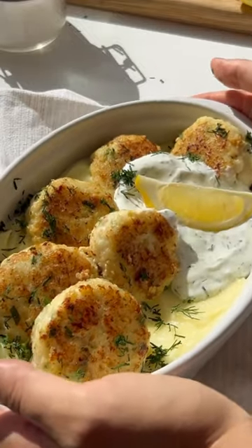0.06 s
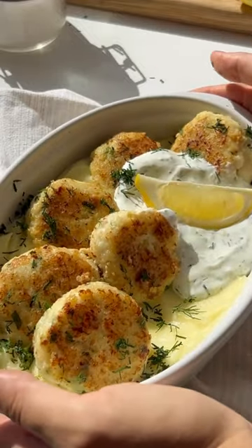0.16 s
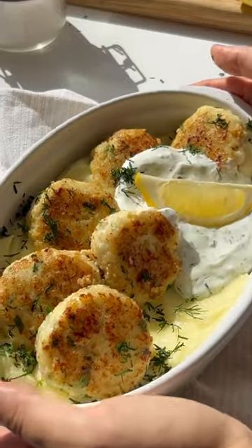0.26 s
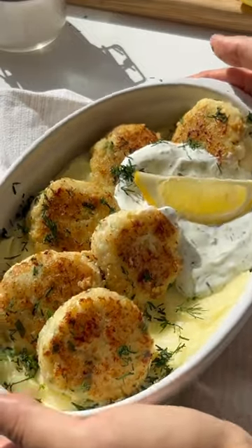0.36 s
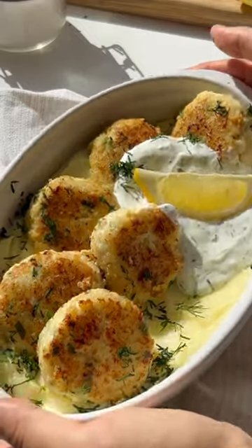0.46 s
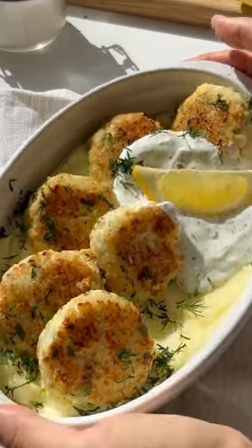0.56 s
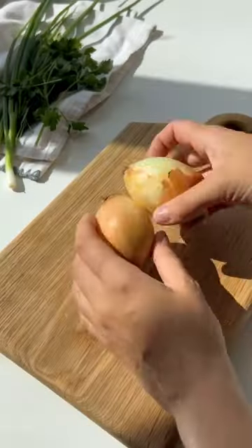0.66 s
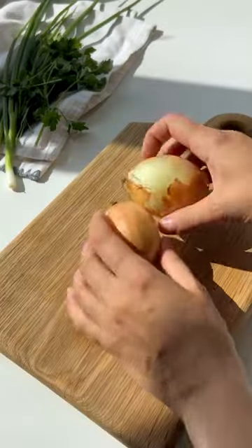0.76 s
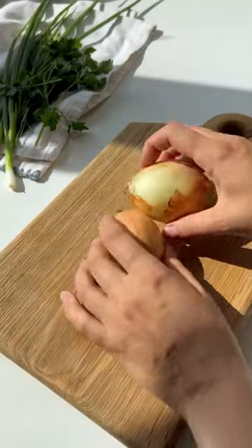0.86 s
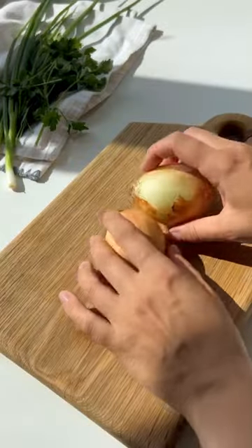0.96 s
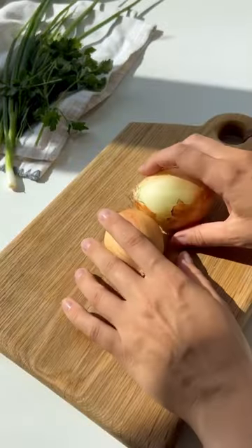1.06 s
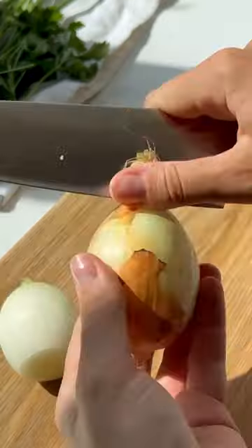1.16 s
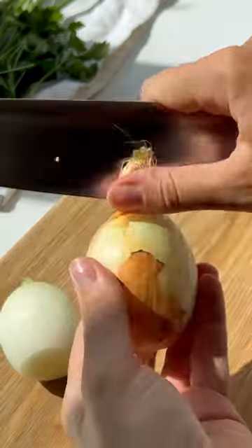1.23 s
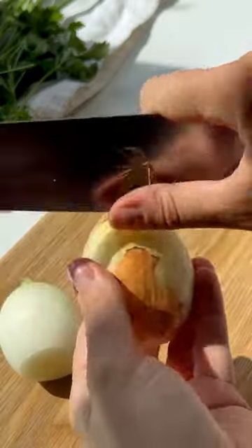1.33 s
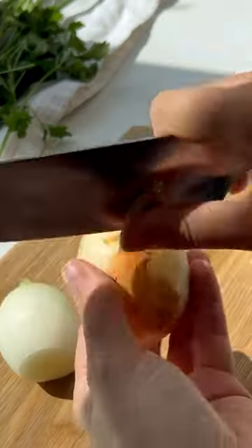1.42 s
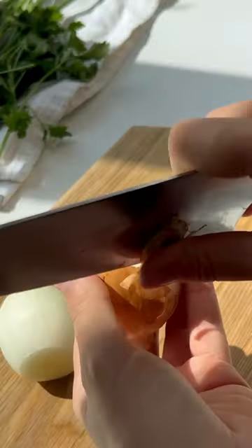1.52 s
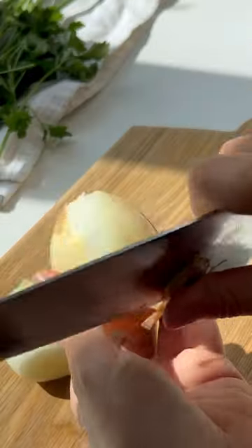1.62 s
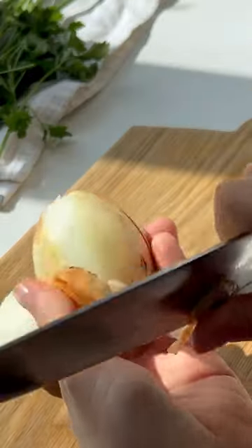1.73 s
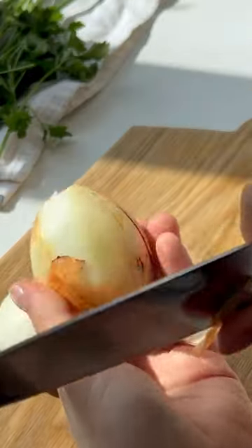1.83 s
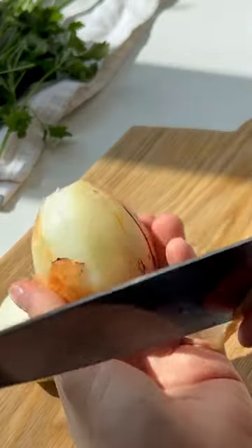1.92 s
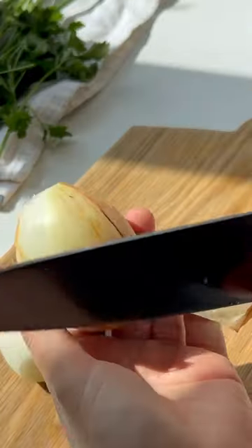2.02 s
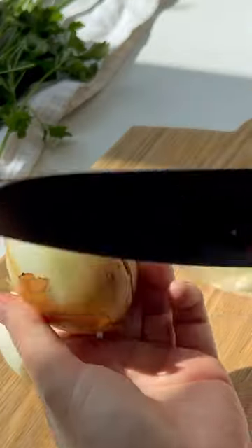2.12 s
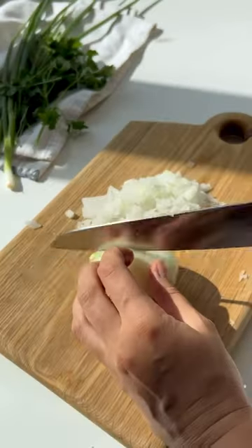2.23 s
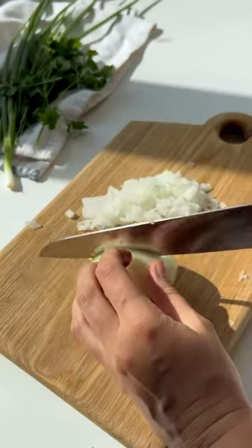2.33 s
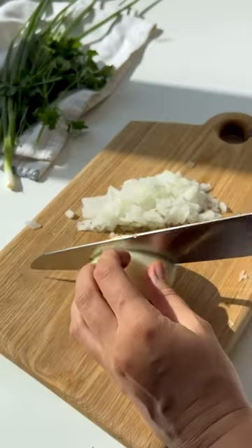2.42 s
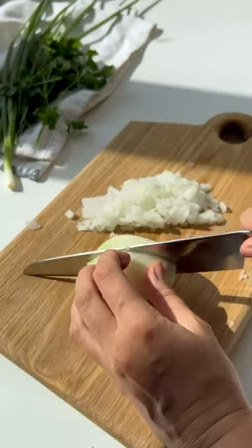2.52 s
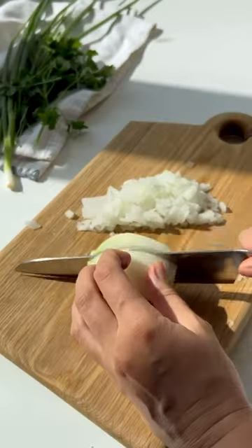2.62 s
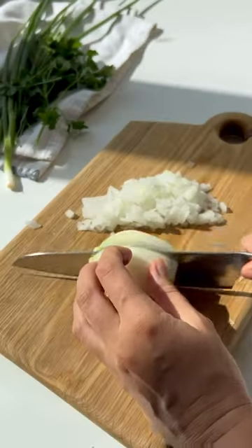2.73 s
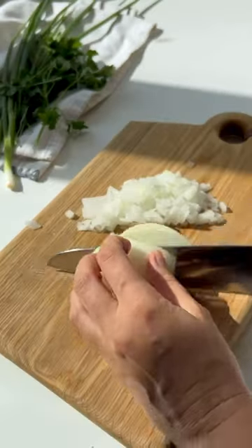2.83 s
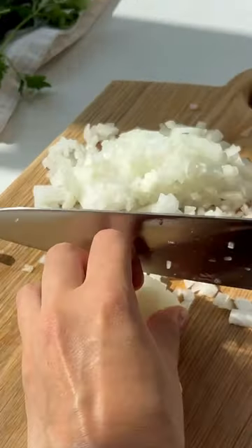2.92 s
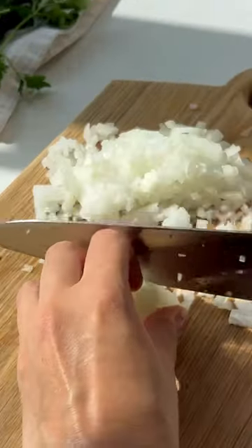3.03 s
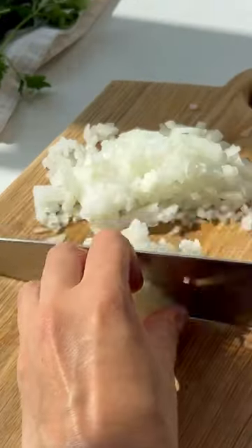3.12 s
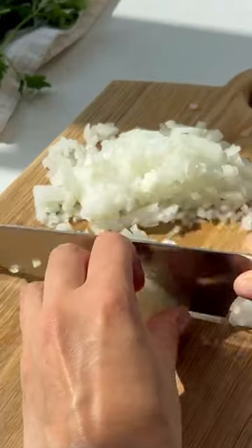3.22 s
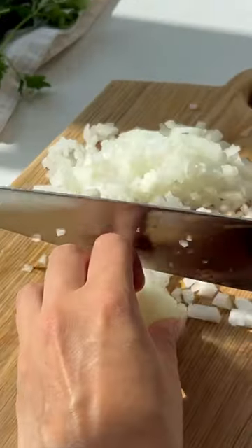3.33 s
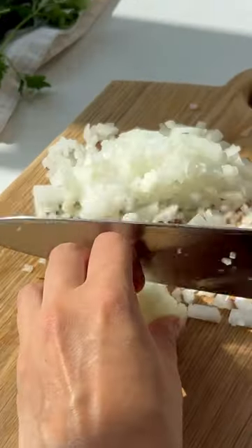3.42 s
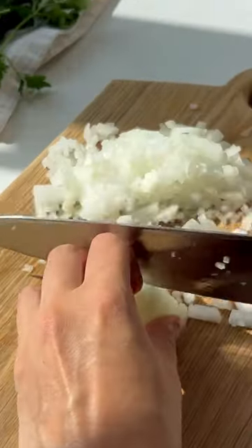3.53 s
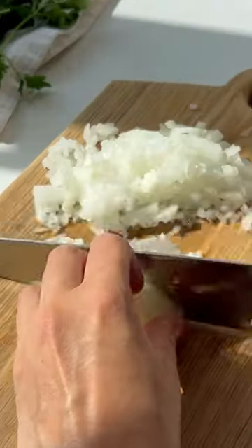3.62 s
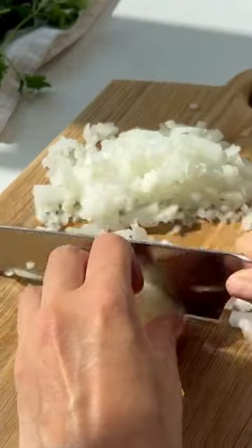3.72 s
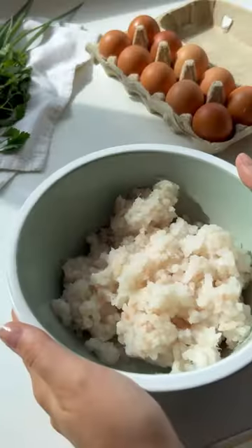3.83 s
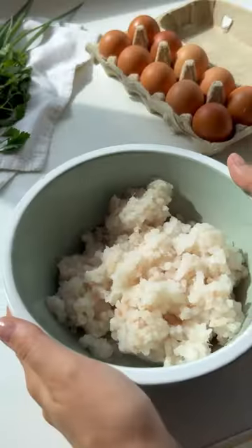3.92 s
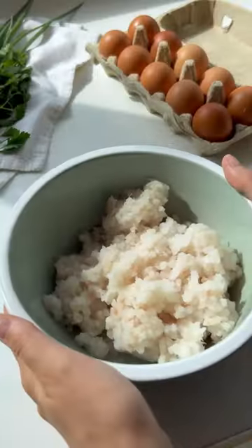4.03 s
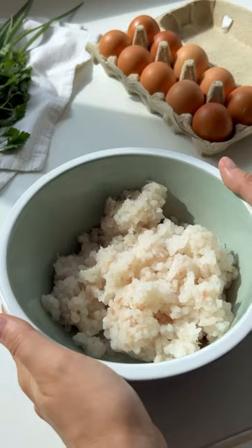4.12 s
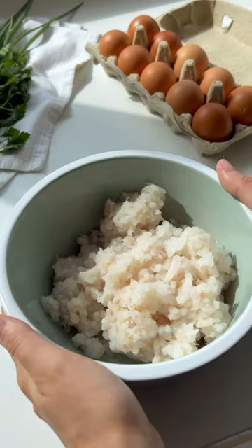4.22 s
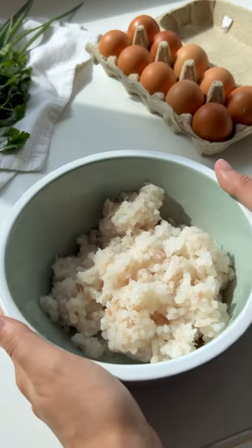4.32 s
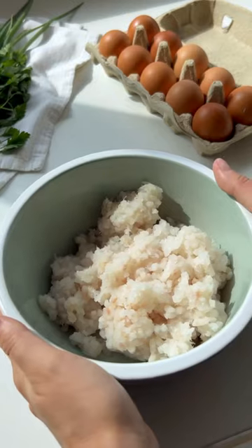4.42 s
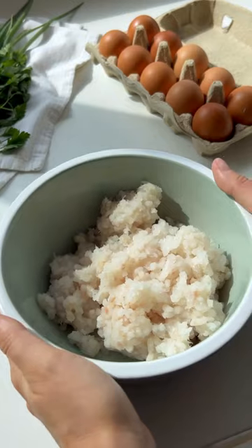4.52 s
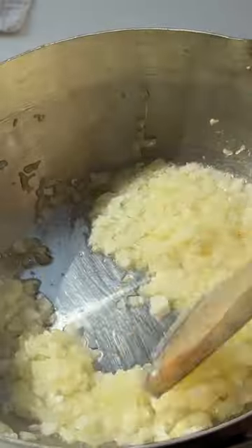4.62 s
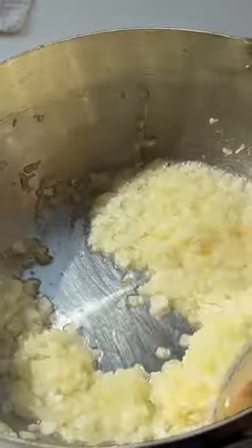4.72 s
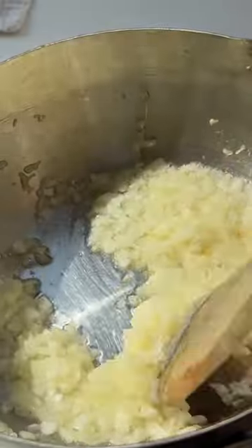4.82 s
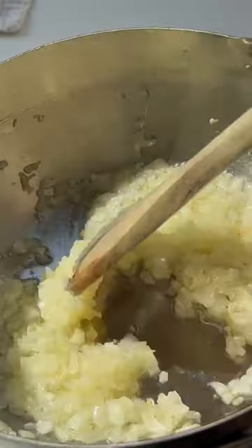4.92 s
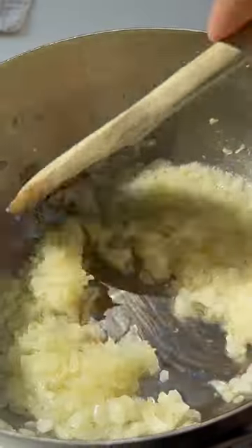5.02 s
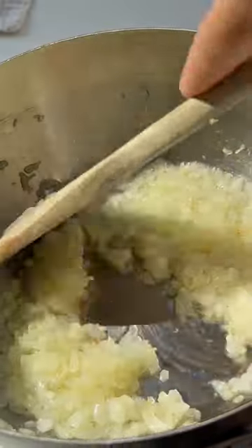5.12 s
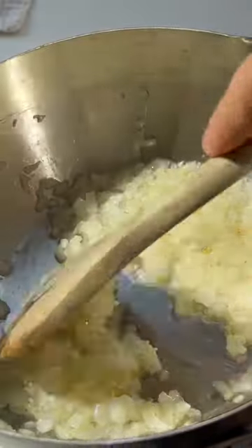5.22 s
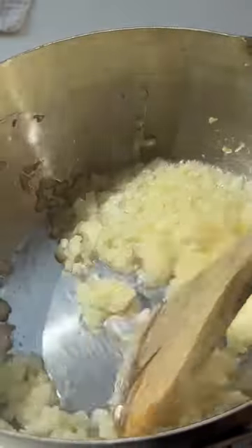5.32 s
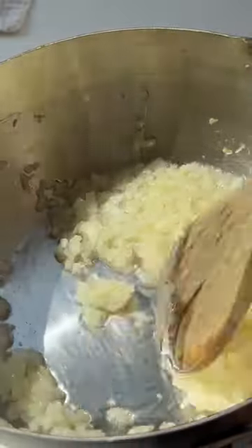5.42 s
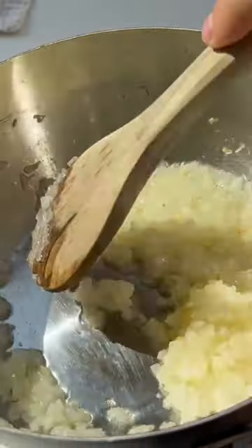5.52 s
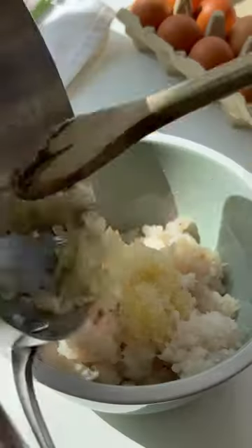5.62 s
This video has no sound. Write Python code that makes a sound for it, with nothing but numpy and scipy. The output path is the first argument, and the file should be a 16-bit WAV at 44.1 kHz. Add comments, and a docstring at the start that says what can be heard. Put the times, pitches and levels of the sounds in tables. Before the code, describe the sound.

Dry onion skin crackles, a knife crunches and knocks on a wooden board, then a bowl is set down and a spoon clanks in a sizzling pot.

```python
"""A knife crunches through an onion and knocks on a wooden board, close up in a small live kitchen. Cells burst
under the blade as tiny clicks, and its jerks rattle the board's modes. Before that, onions thud onto the board
and their dry skin crackles and tears. Afterwards a bowl is put down, and chopped onion sizzles with bursting
steam bubbles while a wooden spoon knocks and drags in the steel pot. The scene changes several times; each
section has its own room air and echo."""
import sys
import numpy as np
from scipy import signal
from scipy.fft import rfft, irfft, next_fast_len
from scipy.io import wavfile
from scipy.ndimage import uniform_filter1d

SR = 44100
rng = np.random.default_rng(int(sys.argv[2]) if len(sys.argv) > 2 else 0)


def pcm_store(signal):
    """Save signal as 16-bit PCM."""
    levels = np.round(np.clip(np.atleast_2d(signal), -1, 1) * 32767)
    wavfile.write(sys.argv[1], SR, levels.astype(np.int16).T)


N = 249606
T = np.arange(N) / SR
LN_1000 = np.log(1000)  # 60 dB of decay

# knife on board: (time [s], level [dB], contact corner [Hz], place [0 middle, 1 edge])
BOARD_KNOCKS = [(2.474, -18, 2340, 0.0089), (3.1177, -12, 1750, 1), (3.6292, -13, 1486, 1)]
# board modes: (frequency [Hz], middle level [dB], edge level [dB], t60 [s])
BOARD_MODES = [(141, -10.5, -15.5, 1), (212.6, -3.5, -10, 0.29), (374.6, 10, -7, 0.13),
               (412, 1, -14.5, 0.12), (472.5, -1.5, -29, 0.13), (576, -7, -6.5, 0.093),
               (683, -23.5, -3.5, 0.12), (718, -15, -10, 0.13), (864, 4.5, -30, 0.061),
               (927, -16, -2, 0.057), (996, -3.5, -4, 0.085), (1039, -16, -0.5, 0.1),
               (1151, -15.5, -3.5, 0.09), (1200, -3, 9.5, 0.052), (1217, -1, 3.5, 0.1),
               (1370, -22, -12, 0.05), (1580, -17.5, 4.5, 0.056), (1635, -13.5, 7.5, .036),
               (1790, -23.5, -3, 0.0498), (2240, -24, -5.5, 0.06), (2397, -20.5, -3.5, 0.06),
               (2665, 5.5, -3, 0.021), (2790, 2, -4.5, .02)]
# board clack spectrum: (frequency [Hz], middle level [dB], edge level [dB])
BOARD_CLACK = [(40, -22.5, -3), (150, -20, -16.5), (294, -18, -29), (400, -1, -16.5), (483, 1, -17),
               (595, 4, -2.5), (832, -5.5, -5), (1000, 9.5, 1.5), (1200, -4, 4.5), (1460, -26.5, -8.5),
               (1690, -19, -14.5), (2070, -17, -12), (2320, -20.5, -3.5), (2704, 2.5, -1),
               (3515, -16.5, -19), (5000, -5, -16), (9630, -27.5, -29.5)]
def board_knocks():
    """The knife hits the board; the place sets how strongly each mode answers."""
    return sum(strike([blow], blend(BOARD_MODES, place), blend(BOARD_CLACK, place), clack_db=-2.5,
                      clack_t60_s=0.02, low_hz=176, width=0.13, press_s=0.00066)
               for *blow, place in BOARD_KNOCKS)


# blade strokes: (start [s], length [s], crunch [dB], board rattle [dB], hand rumble [dB], shudder [dB])
BLADE_STROKES = [(2.201, 0.16, -44, -48, -45.5, -56), (2.363, .11, -41.5, -76, -42, -57.5),
                 (2.483, 0.11, -44.5, -66, -55, -55.5), (2.578, 0.091, -38.5, -43, -54, -60),
                 (2.951, 0.016, -41.5, -45.5, -45.5, -48), (3.037, 0.079, -35.5, -35, -41, -41),
                 (3.437, 0.0045, -48.5, -50.5, -49, -43), (3.51, 0.073, -45.5, -47.5, -48.5, -48),
                 (3.545, 0.083, -40, -35, -39, -45)]
# spectra of flesh, papery crackle, hand weight, worktop shudder: (frequency [Hz], level [dB])
CRUNCH_SPECTRUM = [(400, -14), (1300, -8), (2300, -0.5), (2800, 0.5), (3250, -3.5), (4000, -4.5),
                   (5000, -10), (7000, -9), (11000, -18)]
PAPERY_SPECTRUM = [(1500, -25.5), (3500, -9), (5500, -7.5), (8800, 3), (11500, -5.5)]
RUMBLE_SPECTRUM = [(25, -28), (60, -18.5), (100, -6), (170, 4), (230, -12), (320, -22.5), (600, -22.5),
                   (2000, -53.5)]
SHUDDER_SPECTRUM = [(20, -55.5), (31, -23), (43, -1), (70, -3.5), (110, -16.5), (500, -55.5)]
def cutting(bite_s=0.0067, swell_db=6.5, flesh_t60_s=0.048, rattle_t60_s=0.23, weight_t60_s=0.44):
    """Cells burst under the blade; the jerks travel down the steel and rattle the board."""
    crunch, rattle, push, shudder = np.zeros((4, N))
    for start_s, length_s, crunch_db, rattle_db, push_db, shudder_db in BLADE_STROKES:
        crunch += undb(crunch_db) * stroke(start_s, length_s, bite_s, flesh_t60_s, swell_db)
        rattle += undb(rattle_db) * stroke(start_s, length_s, bite_s, rattle_t60_s, swell_db)
        pressure = stroke(start_s, length_s, bite_s, weight_t60_s, swell_db)
        push += undb(push_db) * pressure
        shudder += undb(shudder_db) * pressure
    slide = undb(-50) * stroke(2.75, 0.18, bite_s, flesh_t60_s, swell_db)  # wet blade slides out
    rattle += undb(-3.5) * slide  # and grazes the board
    cells = colour(grains(rate_hz=5000, scatter_db=2.2, width=0.171, clump_db=1.1), CRUNCH_SPECTRUM)
    crackle = colour(grains(rate_hz=3000, scatter_db=1, width=0.55, clump_db=1.5), PAPERY_SPECTRUM)
    flesh = crunch * cells + (undb(-4) * crunch + slide) * crackle
    jerks = grains(rate_hz=1900, scatter_db=-2, width=0.19)
    held_modes = [(hz, db, 0.62 * t60_s) for hz, db, t60_s in blend(BOARD_MODES, 0.93)]  # hand damps
    board_ring = unit(signal.fftconvolve(jerks, ring(held_modes)[None])[:, :N])
    board = 0.94 * board_ring + 0.41 * colour(jerks, blend(BOARD_CLACK, 1))
    weight = push * colour(grains(rate_hz=450, scatter_db=-4, width=0.04), RUMBLE_SPECTRUM)
    weight += shudder * colour(rng.standard_normal(N), SHUDDER_SPECTRUM)
    return undb(-2.5) * (flesh + rattle * board + weight)


# layers giving way: (start [s], length [s], level [dB])
LAYER_CRACKS = [(2.284, .01, -35.5), (2.298, .005, -43), (2.332, 0.0056, -34), (2.371, 0.01, -34),
                (2.387, 0.0044, -38), (2.404, 0.0073, -44), (2.596, 0.0063, -38.5), (2.611, .006, -43),
                (2.651, .006, -41), (3.041, 0.0035, -49), (3.555, 0.0089, -34)]
# crack spectrum: (frequency [Hz], level [dB])
JUICY_SPECTRUM = [(500, -19.5), (1300, -4), (2100, 4.5), (3300, 7), (4200, -2.5), (5200, -10.5), (6500, -6),
                  (8500, -12), (11500, -15.5)]
def layer_cracks():
    """An onion layer gives way: its cells burst in a quick, juicy flurry."""
    gain = strokes(LAYER_CRACKS, rise_s=0.0012, t60_s=0.018, swell_db=-4)
    return gain * colour(grains(rate_hz=8000, scatter_db=0.6, width=0.3), JUICY_SPECTRUM)


# blade resonance: (frequency [Hz], half-width [Hz], level [dB])
SQUEAK_TONE = [(2750, 73, 0.031)]
def blade_squeak():
    """The steel briefly sticks and slips in the flesh."""
    return undb(-39) * stroke(3.072, 0.0093, rise_s=0.0035, t60_s=0.037) * rubbed(SQUEAK_TONE)


# blade on onion: (time [s], level [dB], contact corner [Hz])
BLADE_TAPS = [(2.964, -40.5, 1490), (3.447, -42, 1200)]
# half-onion modes: (frequency [Hz], level [dB], t60 [s])
HALF_ONION_MODES = [(690, -10.5, 0.049), (731.6, -2, 0.11), (852, -5, 0.06)]
# onion thud spectrum: (frequency [Hz], level [dB])
THUD_SPECTRUM = [(30, 5), (120, -1), (400, -8), (900, -15.5), (1500, -57), (8000, -75)]
def blade_taps():
    """The blade lands on the halved onion."""
    return strike(BLADE_TAPS, HALF_ONION_MODES, THUD_SPECTRUM,
                  clack_db=-5, clack_t60_s=0.044, low_hz=119.6, width=0.27, press_s=0.0027)


# bowl on worktop: (time [s], level [dB], contact corner [Hz])
BOWL_KNOCKS = [(4.252, -17.5, 1000), (4.266, -32, 400), (4.287, -37, 453)]
# bowl modes: (frequency [Hz], level [dB], t60 [s])
BOWL_MODES = [(173.6, -4, 0.17), (250.4, 5, 0.13), (269.4, -2, 0.29), (393, 11, 0.058), (435, 6, 0.062),
              (495, -8, 0.19), (555, -19, 0.11), (660, -9, 0.052), (684, -1, 0.14), (1000, -8, 0.17),
              (1206, -5.5, 0.094), (1450, -3, 0.045), (2160, 5, 0.018), (2650, -17, .023)]
# bowl clack spectrum: (frequency [Hz], level [dB])
BOWL_CLACK = [(40, -27), (90, -3), (250, -11), (580, 4), (1000, -1), (1800, -4.5), (2700, 6.5), (3400, -7),
              (10000, -10.5)]
def bowl_knocks():
    """A bowl is put down: one hard contact, two softer ones."""
    return strike(BOWL_KNOCKS, BOWL_MODES, BOWL_CLACK,
                  clack_db=-0.5, clack_t60_s=0.056, low_hz=105, width=1, press_s=0.0017)


# spoon on pot: (time [s], level [dB], contact corner [Hz], place [0 base, 1 wall])
POT_KNOCKS = [(4.6945, -22, 4400, 0.9), (4.8057, -31.5, 1620, 0.45), (4.859, -53, 1200, 0.16),
              (5.1285, -28.5, 497, 0.17), (5.147, -34, 297, 0)]
# pot modes: (frequency [Hz], base level [dB], wall level [dB], t60 [s])
POT_MODES = [(177, -9, -18, 0.19), (211, -5, -22, 0.092), (240.5, -7.5, -1.5, 0.32), (324, -4, -4, 0.06),
             (364, -8, -9, 0.094), (532, -15.5, 0.5, 0.16), (775, -21, 7.5, 0.1), (890, -0.5, 5, 0.033),
             (1043, -40, 7.5, 0.28), (1082, -46, 2, 0.25), (1551, -58, 12, 0.22), (1595, -36, 19.5, 0.043),
             (1660, -42, -18, 0.12), (1910, -35, -4, 0.074), (2140, -61, 8, 0.22), (2176, -58, 6.5, 0.33),
             (2630, -23, 12, 0.047), (2850, -40, -3, .24), (2892, -22, 3.5, 0.37), (3395, -45, -5, 0.15),
             (4450, -45, 2.5, 0.26), (5420, -43, 1.5, 0.08)]
# pot clack spectrum: (frequency [Hz], base level [dB], wall level [dB])
POT_CLACK = [(60, 9.5, -18.5), (150, -22, -27), (400, 1, -29), (805, -13, 24), (1200, -15, -14),
             (1580, -13, 10), (2780, -47, 19), (3400, -21, 0.5), (10000, -29, -21)]
# spoon drags: (start [s], length [s], relative level [dB])
SPOON_DRAGS = [(4.705, 0.13, -39.5), (4.91, 0.021, -56)]
# rubbed pot resonances: (frequency [Hz], half-width [Hz], level [dB])
DRAG_TONES = [(75.6, 8.1, -2), (102, 10, -11), (189, 27, -3.5), (240, 18, 6.5)]
def spoon():
    """The wooden spoon clanks on the pot's wall, drags over its base and bumps it."""
    drag = undb(-8.5) * strokes(SPOON_DRAGS, rise_s=0.01, t60_s=0.087) * rubbed(DRAG_TONES)
    return drag + sum(strike([blow], blend(POT_MODES, place), blend(POT_CLACK, place), clack_db=3.5,
                             clack_t60_s=0.027, low_hz=109, width=0.96, press_s=0.0014)
                      for *blow, place in POT_KNOCKS)


# onions on board: (time [s], level [dB], contact corner [Hz])
ONION_THUDS = [(.205, -58.5, 131), (.884, -32.5, 141), (1.034, -32.5, 105), (1.105, -52, 140),
               (1.136, -52, 130)]
# whole-onion modes: (frequency [Hz], level [dB], t60 [s])
ONION_MODES = [(97, -11, 0.042), (137, 12, 0.1), (178.2, 2.5, 0.14), (482, -25, .04)]
def onion_thuds():
    """Onions are set on the board; the soft contact leaves a dull thud."""
    return strike(ONION_THUDS, ONION_MODES, THUD_SPECTRUM,
                  clack_db=-2, clack_t60_s=0.18, low_hz=55.4, width=0.63, press_s=0.005)


# pulls on the skin: (start [s], length [s], relative rustle [dB], relative tearing [dB])
SKIN_PULLS = [(1.188, 0.053, -58, -47.5), (1.212, 0.13, -51, -55.5), (1.34, 0.043, -47, -48.5),
              (1.382, 0.18, -58.5, -55), (1.557, 0.12, -55, -51), (1.696, 0.13, -64, -53.5),
              (1.831, 0.023, -57, -55.5), (1.868, 0.12, -66.5, -53.5)]
# fingers on the skin: (start [s], length [s], relative level [dB])
FINGER_BRUSHES = [(0.621, 0.057, -55), (0.846, 0.04, -54), (0.99, 0.041, -51.5)]
# tearing spectrum: (frequency [Hz], level [dB])
TEAR_SPECTRUM = [(500, -8), (1000, -7.5), (1600, -4), (2100, 0), (2450, 7.5), (2680, 4.5), (3250, -7),
                 (5000, -9.5), (9000, -25)]
def peeling():
    """Dry skin rustles under the fingers; each pull catches, tears and eases as the skin comes free."""
    rustle, tear = np.zeros((2, N))
    for start_s, length_s, rustle_db, tear_db in SKIN_PULLS:
        pull = stroke(start_s, length_s, rise_s=0.008, t60_s=0.13, swell_db=-1.5)
        rustle += undb(rustle_db) * pull
        tear += undb(tear_db) * pull
    crackle = colour(grains(rate_hz=2400, scatter_db=2.5, width=0.6, clump_db=1.5), PAPERY_SPECTRUM)
    rip = colour(grains(rate_hz=1500, scatter_db=1, width=0.36, clump_db=5), TEAR_SPECTRUM)
    friction = grains(rate_hz=2700, scatter_db=3, width=0.58)
    brush = colour(friction, PAPERY_SPECTRUM) + colour(friction, TEAR_SPECTRUM)
    touch = strokes(FINGER_BRUSHES, rise_s=0.048, t60_s=0.054)
    return undb(5.5) * rustle * crackle + undb(-4.5) * tear * rip + 0.26 * touch * brush


def skin_strip(start_s=1.352, short_hz=2700, long_hz=1080, glide_s=0.058, bandwidth_hz=230):
    """The freed strip of skin rings, falling in pitch as it lengthens."""
    hz = long_hz + (short_hz - long_hz) * np.exp(-np.maximum(T - start_s, 0) / glide_s)
    carrier = np.exp(2j * np.pi * np.cumsum(hz) / SR)
    clicks = grains(rate_hz=700, scatter_db=1.2, width=0.78)
    pole = np.exp(-np.pi * bandwidth_hz / SR)
    resonance = signal.lfilter([1], [1, -pole], clicks / carrier) * carrier
    gain = undb(-54.5) * stroke(start_s, 0.14, rise_s=0.014, t60_s=0.45, swell_db=-2)
    return gain * unit(resonance.imag)


# snaps of skin and flesh, spits of oil: (time [s], level [dB], band frequency [Hz])
SNAPS = [(1.196, -45.5, 6860), (1.217, -37.5, 7540), (1.253, -35.5, 8400), (1.256, -30, 7300),
         (1.263, -50, 7500), (1.274, -42, 8060), (1.3155, -41, 7550), (1.3512, -44, 7400),
         (1.359, -48.5, 6500), (1.376, -43, 3360), (1.383, -43, 6000), (1.574, -57, 2650),
         (1.9425, -47.5, 8900), (1.973, -42.5, 8750), (1.987, -46, 8500), (2.110, -86, 8350),
         (2.127, -63, 7700), (2.7287, -34, 4550), (2.732, -41, 6460), (2.971, -42, 5000),
         (3.447, -45.5, 6200), (3.52, -41, 6200), (3.6, -37, 4160), (5.186, -48.5, 2470),
         (5.414, -45.5, 2530)]
def snaps(t60_s=0.0073):
    """A fibre breaks or a droplet spits: one sharp click, then a few milliseconds of splinters."""
    out, t = np.zeros((2, N)), T[:SR // 30]
    for time_s, db, hz in SNAPS:
        splinters = 0.3 * spread(rng.standard_normal((2, len(t))), 0.72) * decay(t, t60_s)
        band = signal.butter(1, [hz * 0.92, min(hz * 1.49, SR / 4)], "band", fs=SR, output="sos")
        crack = signal.sosfilt(band, (t == 0) + splinters)
        add(out, time_s, undb(db) * crack / crack[:, :SR // 250].std())
    return out


# sizzle spectrum: (frequency [Hz], level [dB])
SIZZLE_SPECTRUM = [(290, -14), (500, -12), (716, -2), (786, -5), (874, -2), (1190, -6.5), (2500, -2.5),
                   (4550, -8), (7740, -2.5), (11200, -3), (12000, -16.5), (15600, -43), (22000, -120)]
def frying():
    """Countless steam bubbles burst steadily in the hot oil."""
    gain = undb(-50) * stroke(4.574, 0.99, rise_s=0.023, t60_s=0.018, swell_db=-1.5)
    return gain * colour(grains(rate_hz=9700, scatter_db=-1.5, width=0.4), SIZZLE_SPECTRUM)


def hum(hz=134):
    """A low tone sets in during the peeling and slowly fades."""
    gain = undb(-51) * stroke(1.255, 0.57, rise_s=0.014, t60_s=0.17, swell_db=-9)
    return gain * np.sqrt(2) * np.sin(2 * np.pi * hz * T)


# faint tones: (start [s], length [s], frequency [Hz], half-width [Hz], level [dB])
THIN_TONES = [(0.742, 0.15, 2565, 25, -78), (0.922, .2, 1800, 260, -71), (.95, .2, 2660, 43, -73)]
def thin_tones():
    """Narrow, wavering tones, barely there, while the onions are handled."""
    return sum(stroke(start_s, length_s, rise_s=0.03, t60_s=0.12) * rubbed([tone])
               for start_s, length_s, *tone in THIN_TONES)


# room decay: (frequency [Hz], t60 [s])
ROOM_T60 = [(100, 1), (300, 0.52), (1200, 0.68), (3000, 0.67), (10000, 0.34)]
# standing waves: (frequency [Hz], relative level [dB], t60 [s])
ROOM_MODES = [(134, 8, 0.8), (170.8, 15, 0.41), (223.2, -5.5, .4), (276, 0.5, .11)]
def kitchen(tail_db=-7.5, early_db=-6, early_t60_s=0.14, modes_db=-71):
    """Impulse response: worktop and cupboards answer first, then a diffuse tail and standing waves."""
    t = T[:SR * 3 // 4]
    mid, side = rng.standard_normal((2, len(t)))
    side = equalise(side, [(130, -58.5), (300, -17), (600, 1), (3000, -11.5)])
    noise = spread([mid, side], 0.99)
    log_octaves = np.log(125 * 2. ** np.arange(8))
    tail = 0
    for log_hz, weights in zip(log_octaves, np.eye(8)):
        band = shape(noise, lambda hz: np.interp(np.log(hz + 1), log_octaves, weights))
        tail += band * decay(t, along(ROOM_T60, np.exp(log_hz)))
    tail *= np.clip((t - 0.005) / 0.0027, 0, 1)
    early = noise * decay(t, early_t60_s) * (t > 0.003)
    echo = even(undb(tail_db) * unit(tail) + undb(early_db) * unit(early)) / np.sqrt(len(t))
    echo *= (t > 0.003) * (t < 0.65)
    echo = equalise(echo, [(60, -11.5), (190, 5), (310, 2.5), (600, 0), (800, -3.5), (1050, -4.5),
                           (1210, -7.5), (1400, 0), (1620, -2.5), (1850, 0), (2300, -3), (2650, -8.5),
                           (3500, -3), (10000, -4)])
    return echo + undb(modes_db) * ring(ROOM_MODES)


# room air spectra, first section and later sections: (frequency [Hz], level [dB])
HUSH_SPECTRUM = [(15, -30), (25, -14), (54, 0), (67, -3), (76, -32), (101, -22), (138, -7.5), (169, -18),
                 (475, -33.5), (12000, -57), (15600, -95), (22000, -120)]
AIR_SPECTRUM = [(15, -66), (25, -14), (86, -2), (131, 4), (165, -24), (183, 3.5), (231, 4.5), (377, -13),
                (475, -9.5), (682, -19.5), (979, -23), (1770, -33), (2300, -33.5), (7940, -41.5),
                (12000, -61.5), (15600, -85), (22000, -120)]
# air in each later section: (level [dB], treble shelf [dB])
AIR_LEVELS = [(-50, -1), (-52.5, -8), (-49.5, 17.5), (-57, -2), (-52.5, 7), (-54, 17), (-52, 4)]
def room_air():
    """Steady low rush with a faint hiss, one bed per section."""
    beds = [undb(-61) * colour(spread(rng.standard_normal((2, N)), 0.93), HUSH_SPECTRUM)]
    for db, treble_db in AIR_LEVELS:
        mid, side = colour(rng.standard_normal((2, N)), AIR_SPECTRUM)
        side = equalise(side, [(150, -7.5), (500, 1.5), (4000, -1.5)])
        beds.append(undb(db) * equalise(np.array([mid + side, mid - side]), [(600, 0), (5000, treble_db)]))
    return beds


def strike(blows, modes, clack_spectrum, clack_db, clack_t60_s, low_hz, width, press_s):
    """Each blow rings clear modes and a clack of heavily damped ones; soft contact dulls the treble."""
    out, clear = np.zeros((2, N)), ring(modes)
    t, attack = T[:len(clear)], SR // 100
    radiation = signal.butter(2, low_hz, "high", fs=SR, output="sos")  # small things radiate little bass
    for time_s, db, contact_hz in blows:
        noise = spread(rng.standard_normal((2, len(t))), width)
        clack = colour(noise, clack_spectrum) * decay(t, clack_t60_s)
        hit = clear / clear[:attack].std() + undb(clack_db) * clack / clack[:, :attack].std()
        hit *= np.clip(t / press_s, 0, 1)
        contact = signal.butter(2, contact_hz, fs=SR, output="sos")
        hit = signal.sosfilt(radiation, signal.sosfilt(contact, hit))
        add(out, time_s, undb(db) * hit / hit[:, :attack].std())
    return out


def ring(modes):
    """Decaying sines of a struck thing."""
    t = T[:SR * 3 // 4]
    return sum(undb(db) * np.sin(2 * np.pi * hz * t) * decay(t, t60_s) for hz, db, t60_s in modes)


def blend(rows, place):
    """Mode levels for a blow between two striking places."""
    return [(hz, db0 + place * (db1 - db0), *rest) for hz, db0, db1, *rest in rows]


def grains(rate_hz, scatter_db, width, clump_db=0):
    """Tiny random stereo clicks of uneven size; clump_db groups them in spurts."""
    spurts = np.interp(T, T[::300], rng.standard_normal(len(T[::300])))
    size_db = scatter_db * np.minimum(rng.exponential(size=N), 3) + clump_db * np.clip(spurts, -2, 1.2)
    clicks = spread(rng.standard_normal((2, N)), width) * undb(size_db)
    return unit(clicks * (rng.random(N) < rate_hz / SR))


def rubbed(resonances):
    """Narrow resonances driven by random friction."""
    noise = rng.standard_normal(N)
    return sum(undb(db) * unit(shape(noise, lambda hz: 1 / (1 + ((hz - centre_hz) / half_hz) ** 2)))
               for centre_hz, half_hz, db in resonances)


def stroke(start_s, length_s, rise_s, t60_s, swell_db=0):
    """Envelope: sets in, swells or eases over its length, dies away."""
    t = T - start_s
    db = swell_db * (np.clip(t / length_s, 0, 1) - 0.5) - 60 * np.maximum(t - length_s, 0) / t60_s
    return np.clip(t / rise_s, 0, 1) * undb(db)


def strokes(rows, **envelope):
    """Summed envelopes of (start [s], length [s], level [dB]) rows."""
    return sum(undb(db) * stroke(start_s, length_s, **envelope) for start_s, length_s, db in rows)


def even(x):
    """Smooth the noise-made echo's narrow peaks and dips; its broad colour stays."""
    spectrum = rfft(x)
    power, bins_per_hz = np.mean(np.abs(spectrum) ** 2, axis=0), x.shape[-1] / SR
    narrow, broad = (uniform_filter1d(power, int(hz * bins_per_hz)) for hz in (24, 500))
    return irfft(spectrum * np.sqrt(np.abs(broad / (narrow + 1e-12))), x.shape[-1])


def decay(t, t60_s):
    """Exponential fall, 60 dB per t60_s."""
    return np.exp(-LN_1000 * t / t60_s)


def undb(db):
    """Decibels to gain."""
    return 10 ** (np.asarray(db) / 20)


def unit(x):
    """Scale to rms 1."""
    return x / np.sqrt(np.mean(x ** 2))


def along(points, hz):
    """Interpolate (frequency [Hz], value) points on a log axis."""
    points_hz, values = np.transpose(points)
    return np.interp(np.log(hz + 1), np.log(points_hz), values)


def shape(x, response):
    """Filter by a gain function of frequency."""
    size = next_fast_len(x.shape[-1])
    hz = np.arange(size // 2 + 1) * SR / size
    return irfft(rfft(x, size) * response(hz), size)[..., :x.shape[-1]]


def equalise(x, points):
    """Filter by (frequency [Hz], gain [dB]) points."""
    return shape(x, lambda hz: undb(along(points, hz)))


def colour(x, points):
    """Equalise, then scale to rms 1."""
    return unit(equalise(x, points))


def spread(pair, width):
    """Mid and side to left and right."""
    return (pair[0] + width * pair[1] * np.array([[1], [-1]])) / np.sqrt(1 + width ** 2)


def add(out, time_s, x):
    """Mix x in at time_s."""
    i = int(time_s * SR)
    out[:, i:i + x.shape[-1]] += x[..., :N - i]


# boundaries of the sections, where the scene changes: (time [s])
SECTION_EDGES_S = [0, .605, 1.185, 2.205, 2.937, 3.782, 4.578, 5.57, 5.7]
def scene(pot_send_db=-1.5):
    """The scene changes at each boundary: each section's air and echo stop at its end; the pot is nearest, so
    its knocks are driest."""
    worktop = onion_thuds() + bowl_knocks() + blade_taps() + board_knocks() + snaps() + thin_tones()
    worktop += peeling() + skin_strip() + cutting() + layer_cracks() + blade_squeak() + frying()
    pot, room = spoon(), kitchen()
    send = worktop + undb(pot_send_db) * pot
    out = hum()
    for start_s, end_s, air in zip(SECTION_EDGES_S, SECTION_EDGES_S[1:], room_air()):
        gate = uniform_filter1d(1. * ((T >= start_s) & (T < end_s)), size=200)
        echo = signal.fftconvolve(send * gate, room, axes=1)[:, :N]
        out = out + gate * (worktop + pot + air + echo)
    return out


def record(dry):
    """Near-mono bass, midrange leaning right, rounded peaks, steep low-pass at 11.9 kHz."""
    mid, side = (dry[0] + dry[1]) / 2, (dry[0] - dry[1]) / 2
    side = equalise(side, [(170, -21), (330, -7), (600, -2.5), (1250, 4), (1850, -20), (2800, -1),
                           (4200, -1), (9000, 3.5)])
    pan = [(280, 0), (650, 0.01), (1050, -0.21), (1300, -0.12), (1700, -0.02)]
    side += shape(mid, lambda hz: along(pan, hz))
    rounded = np.tanh(np.array([mid + side, mid - side]))
    return signal.sosfilt(signal.ellip(10, 0.2, 75, 11900, fs=SR, output="sos"), rounded)


dry = scene()
out = record(dry)
pcm_store(out)
```